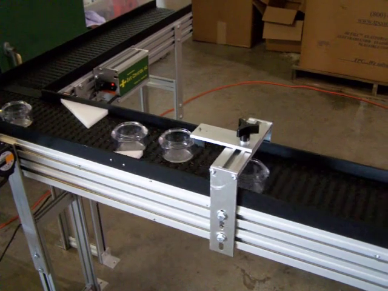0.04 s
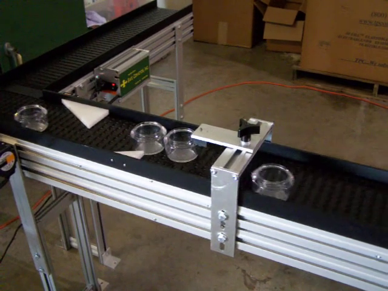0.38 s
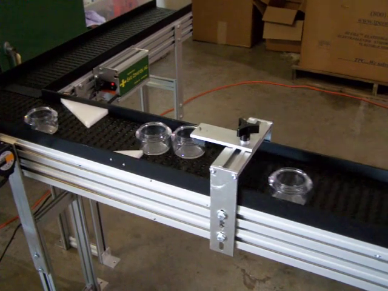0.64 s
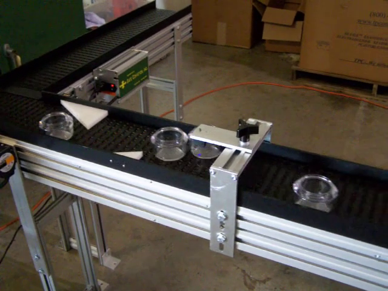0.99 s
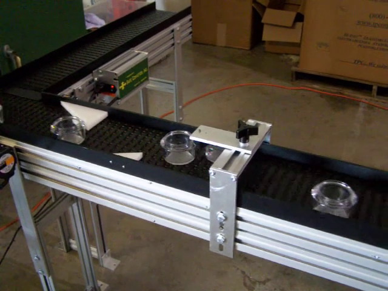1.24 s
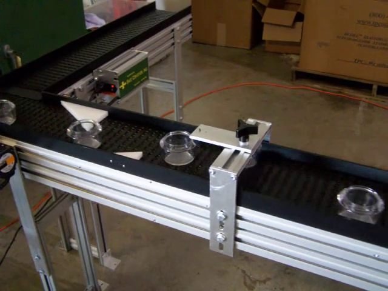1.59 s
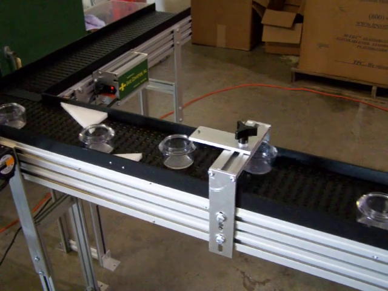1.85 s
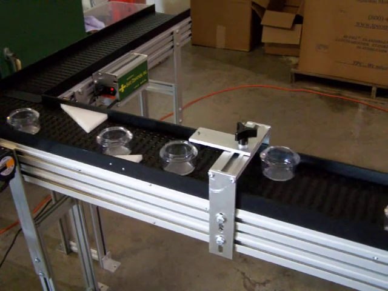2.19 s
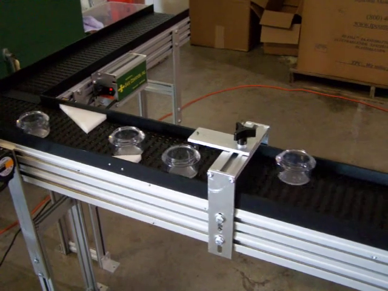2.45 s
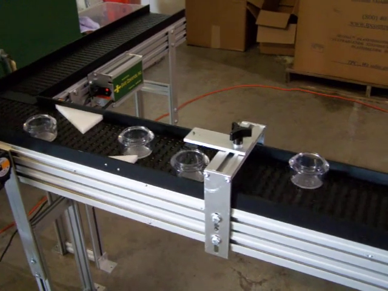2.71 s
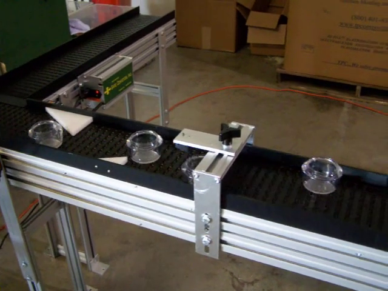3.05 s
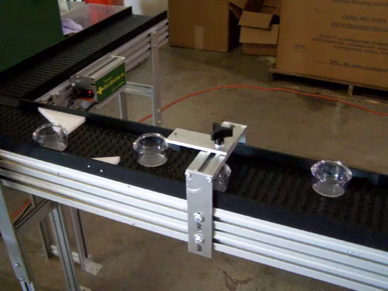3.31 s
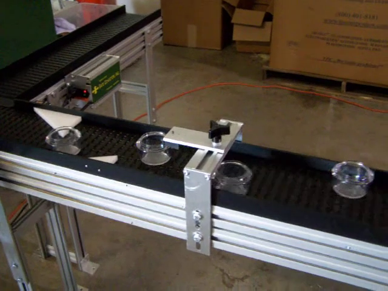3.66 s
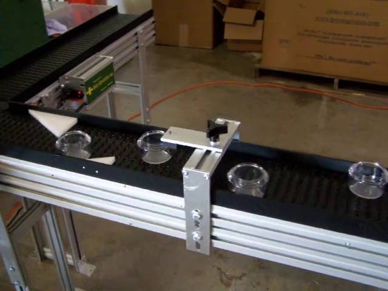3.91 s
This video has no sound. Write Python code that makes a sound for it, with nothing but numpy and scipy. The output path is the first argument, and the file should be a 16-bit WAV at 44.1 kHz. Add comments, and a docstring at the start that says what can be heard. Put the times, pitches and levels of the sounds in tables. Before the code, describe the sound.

A conveyor belt runs with a steady hiss and hum, broken by three sharp clacks.

```python
"""A belt conveyor carries clear plastic cups through a workshop. From the start the belt hisses and
patters over its bed, the gear motor drones and hums, and a rotating part vibrates deeply. A sharp clack
rings out at once and a second at 1.1 s, while cups tick against the guides from 0.3 s on.
After the third clack, at 3.3 s, the deep vibration runs down; belt, motor and cups carry on to the end.
A limiter ducks briefly on the loud clacks."""
import sys
import numpy as np
from scipy import signal
from scipy.fft import rfft, irfft
from scipy.io import wavfile
from scipy.ndimage import uniform_filter1d

SR = 44100
rng = np.random.default_rng(int(sys.argv[2]) if len(sys.argv) > 2 else 0)


def dump(signal):
    """Clip the signal to [-1, 1] and save it as 16-bit WAV at the path in sys.argv[1]."""
    limited = np.clip(np.atleast_2d(signal).T, -1, 1)
    pcm = np.round(limited * 32767).astype(np.int16)
    wavfile.write(sys.argv[1], SR, pcm)


N = 176400
T = np.arange(N) / SR

# fundamental of the rotating part: t/s, f/Hz, level/dB
ROTOR_FUNDAMENTAL = [(0, 34.8, -31.5), (.3, 34.2, -31.5), (1.0, 34.1, -30.5), (2.1, 34.08, -28),
                     (3.0, 35.46, -29), (3.28, 33.5, -30), (3.44, 30.6, -38), (3.62, 27.1, -52),
                     (4, 21.9, -52)]
# its second harmonic: t/s, level/dB
ROTOR_OCTAVE = [(0, -54), (.33, -61), (.45, -38), (.9, -49), (2.2, -48.5), (2.9, -54), (3.05, -42),
                (3.3, -39), (3.55, -42), (4, -51)]
# tones of the motor's hum and whine: f/Hz, level/dB
HUM_TONES = [(120, -51), (720, -48), (840, -53), (1201, -54.5), (1459, -50.5), (5087, -61.5)]
# resonances of the gear housing: f/Hz, bandwidth/Hz, level/dB
HOUSING_RESONANCES = [(250, 72, -54), (546.6, 67, -39), (590, 39, -40.5), (625, 61, -41.5)]
# swell of the housing's drone: t/s, relative level/dB
DRONE_ENVELOPE = [(0, 0.5), (.2, -1), (.42, 0), (.7, -0.5), (.8, 1), (1.0, 1), (1.2, -3), (1.42, 1.5),
                  (1.6, -1.5), (2.1, -2), (2.4, 2.5), (2.55, 0), (2.7, 5), (2.84, -3.5), (3.05, 0.5),
                  (3.2, -2), (3.34, 5.5), (3.45, -3), (3.78, 0), (3.9, 2.5), (4, -3.5)]
# spectrum of the belt sliding on its bed: f/Hz, relative level/dB
BELT_SPECTRUM = [(40, 4), (90, -1), (140, 1), (200, -2.5), (270, -2.5), (310, -8.5), (450, -4), (750, 0),
                 (1200, -1), (2000, -0.5), (2700, 0), (3300, 2.5), (3900, -2.5), (5200, -7), (6200, -15.5),
                 (7300, -21), (8600, -36)]
# slow change in the belt's sound: t/s, gain/dB
BELT_ENVELOPE = [(0, 0.4), (.8, 0), (1.6, -.3), (2.3, -0.5), (2.9, -.5), (3.4, 0), (4, -0.1)]
# spectrum of a plastic cup: f/Hz, relative level/dB
CUP_SPECTRUM = [(400, -18), (700, -5), (1100, -17.5), (1600, -3.5), (2000, -9), (2450, 4), (2900, 3),
                (3400, 5), (4200, -0.5), (5300, -6.5), (6500, -21), (8500, -33.5)]
# cups touching the guides: t/s, level/dB, T60/s, treble gain/dB, hollow resonance gain/dB
CUP_TICKS = [(0.334, -20.5, 0.033, -2, -5.5), (.651, -19.5, .06, -5, -5), (0.7974, -19.5, .055, -1.5, -3),
             (.843, -25, 0.043, 2, -17), (1.247, -25.5, .025, 9.5, -13), (1.697, -23, 0.053, -2, -11),
             (1.8269, -19.5, 0.05, 3, -14), (1.931, -12.5, 0.024, -4, -16), (1.941, -21.5, 0.022, -8, -13),
             (1.9843, -16, 0.04, -4, -24), (2.149, -18.5, 0.093, -0.5, -14.5), (2.311, -18, .07, -3.5, -14),
             (2.482, -28, 0.034, 8, -9), (3.288, -17, 0.033, 3, -10), (3.465, -24, 0.027, 5, -7),
             (3.5667, -18.5, .04, -9, -18), (3.898, -13.5, 0.027, -9, -20), (3.938, -19.5, .05, -3, -18)]
# blows: t/s, gain/dB, rebound delay/s, rebound re blow/dB, middle ring gain/dB, upper ring gain/dB,
# tail gain/dB, frequency ratio of the upper modes
CLACK_BLOWS = [(.0145, -1.5, .0078, 1, -0.5, -12, 4.5, 0.94), (1.1048, 0.5, .0060, -4, 2.5, -10, -3, 1.04),
               (3.332, 4, 0.0036, -18, -11, 1, -0.5, 1.0)]
# modes of the struck part: f/Hz, relative level/dB, T60/s
STRUCK_MODES = [(2512, 1, 0.0052), (3740, -10, 0.016), (3984, 0, 0.0075), (4196, -6.5, 0.015),
                (4770, -26, 0.034)]
# its lingering rings, one middle and two upper: f/Hz, bandwidth/Hz, relative level/dB, T60/s
STRUCK_RINGS = [(3300, 500, -25.5, 0.83), (4150, 660, -26, 0.7), (5137, 150, -29, 0.34)]
# spectrum of a clack's diffuse tail in the workshop: f/Hz, relative level/dB
TAIL_SPECTRUM = [(600, -20.5), (1700, -11.5), (2200, -5.5), (2500, 6.5), (3200, -2), (4200, -2),
                 (5200, -9.5), (6200, -21), (8500, -49.5)]


def from_db(db):
    """Amplitude grows tenfold for every 20 dB."""
    return 10 ** (np.asarray(db) / 20)


def rms_one(x):
    """Normalisation to unit rms."""
    return x / np.sqrt(np.mean(x ** 2) + 1e-20)


def in_time(rows):
    """Linear interpolation of each column to every sample."""
    times, *columns = np.transpose(rows)
    return [np.interp(T, times, column) for column in columns]


def colour(x, spectrum):
    """Spectral shaping with a roll-off below 20 Hz; unit rms."""
    hz, db = np.transpose(spectrum)
    f = np.maximum(np.arange(N // 2 + 1) * SR / N, 1)
    gain = from_db(np.interp(np.log(f), np.log(hz), db)) * f ** 2 / (f ** 2 + 20 ** 2)
    return rms_one(irfft(rfft(x) * gain, N))


def noise():
    """Gaussian white noise: equal mean power in every hertz."""
    return rng.standard_normal(N)


def drift(rate_hz):
    """Low-passed noise gives a slow random fluctuation; unit rms."""
    f = np.arange(N // 2 + 1) * SR / N
    return rms_one(irfft(rfft(noise()) / (1 + (f / rate_hz) ** 2), N))


def resonance(hz, width_hz):
    """A resonator driven by noise passes a narrow band; unit rms."""
    edges = [hz - width_hz / 2, hz + width_hz / 2]
    return rms_one(signal.sosfilt(signal.butter(2, edges, "band", fs=SR, output="sos"), noise()))


def burst(start, attack, t60):
    """Linear rise, then exponential decay by 60 dB in t60; times in seconds."""
    age = T - start
    return np.clip(age / attack, 0, 1) * from_db(-60 * np.clip((age - attack) / t60, 0, 4))


def workshop(x):
    """Diffuse reverberation: convolution with decaying noise of unit energy."""
    response = noise() * burst(0.016, attack=0.005, t60=1)
    return signal.fftconvolve(x, response / np.sqrt(np.sum(response ** 2)))[:N]


def rotor():
    """Forced vibration at the rotation frequency and its octave; both fall as the part slows."""
    hz, db = in_time(ROTOR_FUNDAMENTAL)
    octave_db, = in_time(ROTOR_OCTAVE)
    angle = 2 * np.pi * np.cumsum(hz) / SR
    return np.sqrt(2) * (from_db(db) * np.sin(angle) + from_db(octave_db) * np.sin(2 * angle))


def gear_motor(wander_hz=0.84, waver_db=1, gear_hz=64, gear_depth=0.19, swell_db=0.9):
    """Wavering hum tones, and gear noise that throbs by amplitude modulation of the housing resonances."""
    hum = np.zeros(N)
    for hz, db in HUM_TONES:
        phase = 2 * np.pi * (np.cumsum(hz + wander_hz * drift(4.6)) / SR + rng.random())
        hum += np.sqrt(2) * from_db(db + waver_db * drift(5)) * np.sin(phase)
    drone_db, = in_time(DRONE_ENVELOPE)
    modulation = 1 + gear_depth * np.sin(2 * np.pi * gear_hz * T)
    throb = rms_one(modulation * from_db(drone_db - swell_db * drift(3.3)))
    housing = sum(from_db(db) * resonance(hz, width) for hz, width, db in HOUSING_RESONANCES)
    return hum + throb * housing


def belt(hiss_db=-27.5, flutter_db=0.5, patter_db=-38, contacts_per_s=220, spread_db=3.5):
    """Sliding friction gives a broadband hiss; small contacts patter as a Poisson process."""
    envelope_db, = in_time(BELT_ENVELOPE)
    hiss = from_db(hiss_db + flutter_db * drift(30)) * colour(noise(), BELT_SPECTRUM)
    strengths = from_db(spread_db * np.minimum(rng.exponential(1, N), 3))
    contacts = (rng.random(N) < contacts_per_s / SR) * strengths
    decay = np.exp(-1 / (0.001 * SR))  # each contact dies with a time constant of 1 ms
    rubs = signal.lfilter([1], [1, -decay], contacts + 1e-18) * noise()
    return from_db(envelope_db) * (hiss + from_db(patter_db) * colour(rubs, CUP_SPECTRUM))


def cups(treble_hz=3800, room_db=-6):
    """Scuffs excite damped vibration in thin plastic, each with its own brightness and hollowness."""
    body = colour(noise(), CUP_SPECTRUM)
    hollow = resonance(hz=1680, width_hz=400)
    treble = signal.sosfiltfilt(signal.butter(2, treble_hz, "high", fs=SR, output="sos"), body)
    ticks = np.zeros(N)
    for start, db, t60, treble_db, hollow_db in CUP_TICKS:
        timbre = body + (from_db(treble_db) - 1) * treble + from_db(hollow_db) * hollow
        ticks += from_db(db) * burst(start, attack=0.0013, t60=t60) * timbre
    return ticks + from_db(room_db) * workshop(ticks)


def impact(start, gain_db, upper_ratio, hold_s=0, base_db=-10.5, attack_s=0.0009, upper_above_hz=3000):
    """Modal superposition: a struck part vibrates freely as a sum of damped sinusoids."""
    out, age = np.zeros(N), T[:SR // 8]
    first = int(start * SR)
    for hz, mode_db, t60 in STRUCK_MODES:
        if hz > upper_above_hz:
            hz *= upper_ratio
        envelope = np.minimum(age / attack_s, 1) * from_db(-60 * np.maximum(age - hold_s, 0) / t60)
        out[first:first + len(age)] += from_db(mode_db) * envelope * np.sin(2 * np.pi * hz * age)
    return from_db(base_db + gain_db) * out


def clacks():
    """Impulsive excitation: a blow and its rebound set a part ringing, and the room reverberates."""
    out = np.zeros(N)
    rings = [(resonance(hz, width), db, t60) for hz, width, db, t60 in STRUCK_RINGS]
    diffuse = colour(noise(), TAIL_SPECTRUM)
    for start, db, delay, rebound_db, middle_db, upper_db, tail_db, upper_ratio in CLACK_BLOWS:
        out += impact(start, db, upper_ratio, hold_s=0.0025)
        out += impact(start + delay, db + rebound_db, upper_ratio)
        rebound_ring = burst(start + delay, attack=0.00046, t60=0.018) * np.sin(2 * np.pi * 3330 * T)
        out += from_db(middle_db - 12) * rebound_ring
        for (ring, ring_db, t60), gain_db in zip(rings, (middle_db, upper_db, upper_db)):
            out += from_db(ring_db + gain_db) * ring * burst(start, attack=0.0054, t60=t60)
        early = from_db(-14.5) * burst(start, attack=0.0032, t60=0.044)
        late = from_db(-31) * burst(start, attack=0.0027, t60=1)
        out += from_db(db + tail_db) * diffuse * (early + late)
    return out


def scene():
    """Superposition: the pressures of all sources add at one microphone."""
    return (rotor() + gear_motor() + belt() + clacks() + cups())[None]


def low_pass(x, stop_hz):
    """Band limiting: a steep filter, 70 dB down from stop_hz upward."""
    return signal.sosfilt(signal.cheby2(14, 70, stop_hz, fs=SR, output="sos"), x)


def record(dry, limit_db=-4.5, attack_s=0.004, release_db_per_s=94, ceiling=0.74):
    """Peak limiting after a dull microphone: the gain lags, so the hardest clack overloads briefly."""
    dull = low_pass(dry, stop_hz=9550)
    excess_db = np.maximum(20 * np.log10(np.abs(dull) + 1e-9) - limit_db, 0)
    release_db = release_db_per_s * T
    held_db = np.maximum.accumulate(excess_db + release_db, axis=-1) - release_db
    lag = np.exp(-1 / (attack_s * SR))
    reduction_db = signal.lfilter([1 - lag], [1, -lag], uniform_filter1d(held_db, size=24))
    clipped = np.clip(dull * from_db(-reduction_db), -ceiling, ceiling)
    return low_pass(clipped, stop_hz=17000)


dry = scene()
out = record(dry)
dump(out)
```